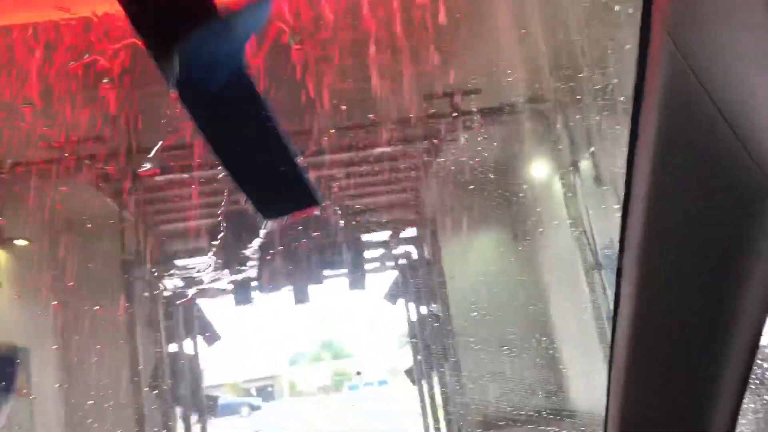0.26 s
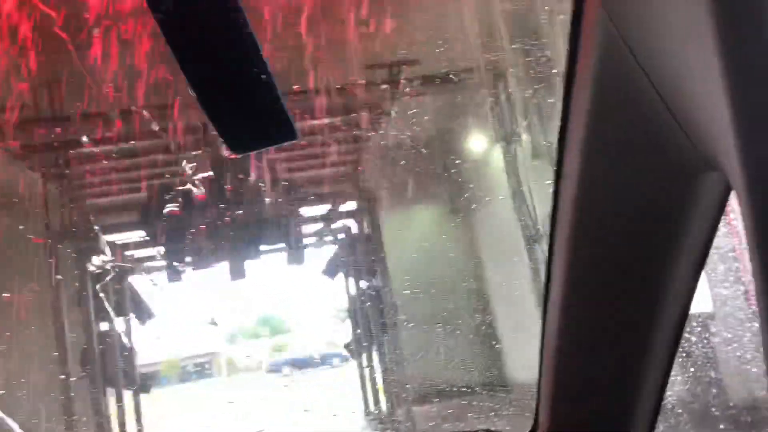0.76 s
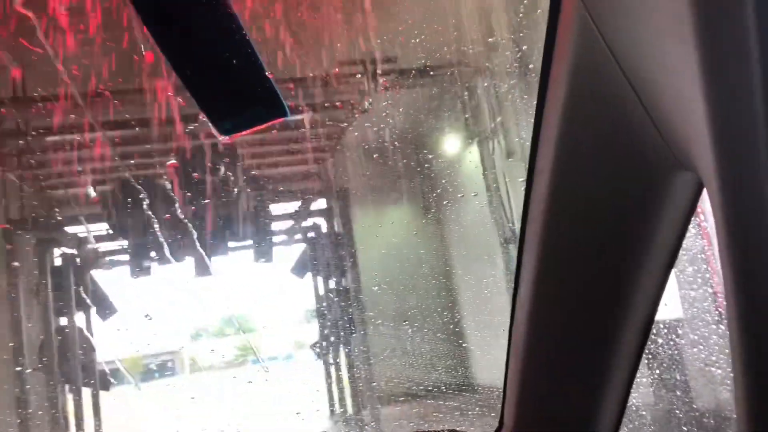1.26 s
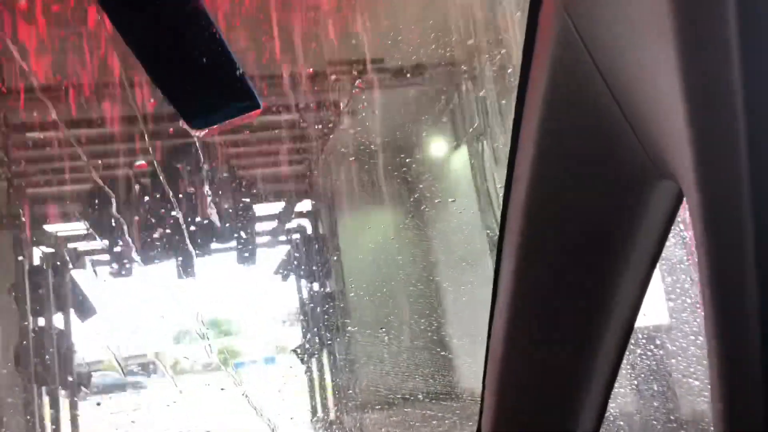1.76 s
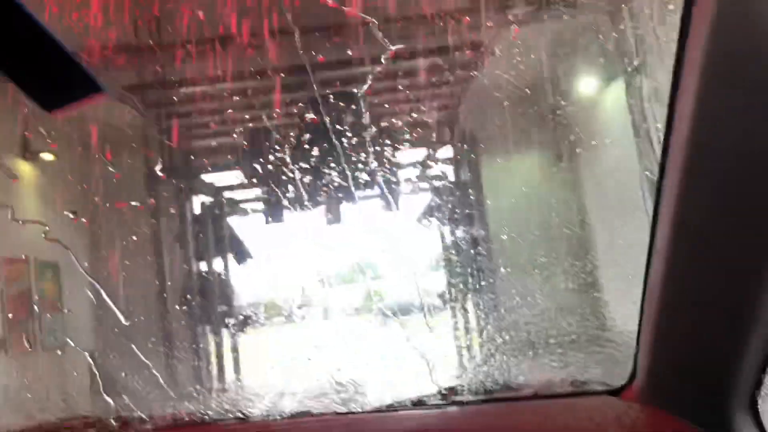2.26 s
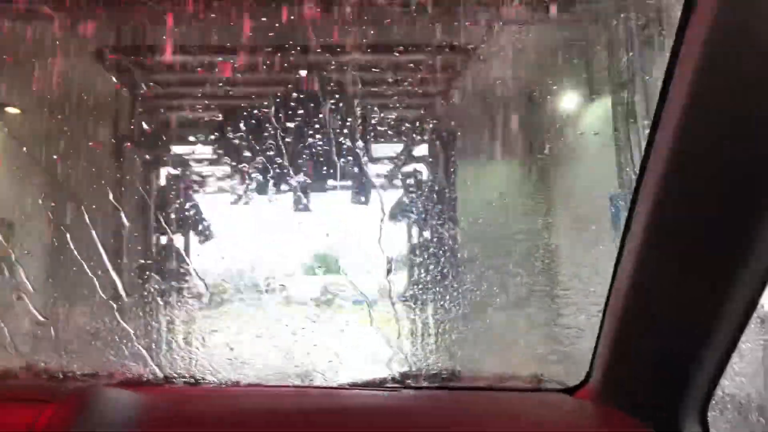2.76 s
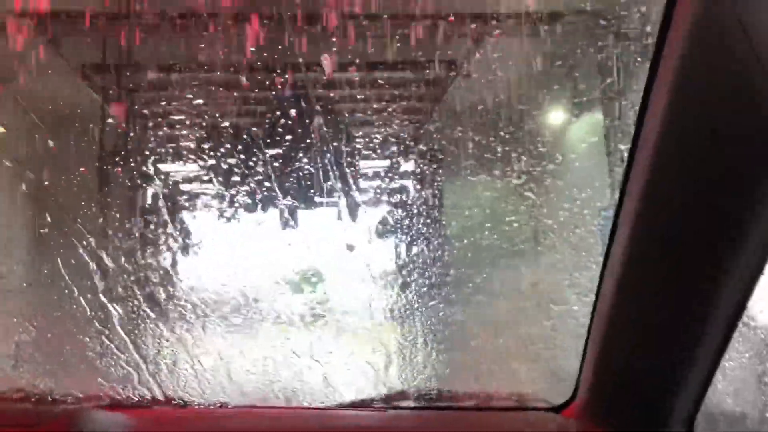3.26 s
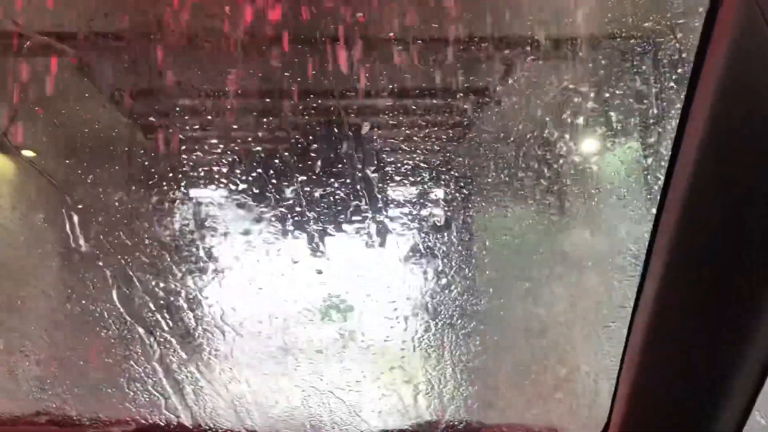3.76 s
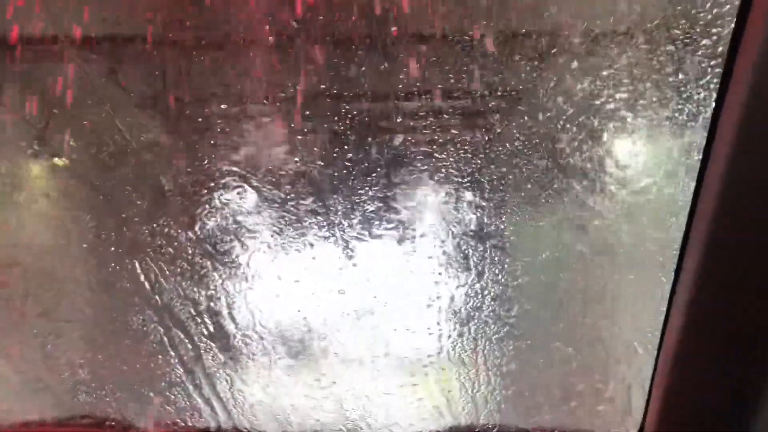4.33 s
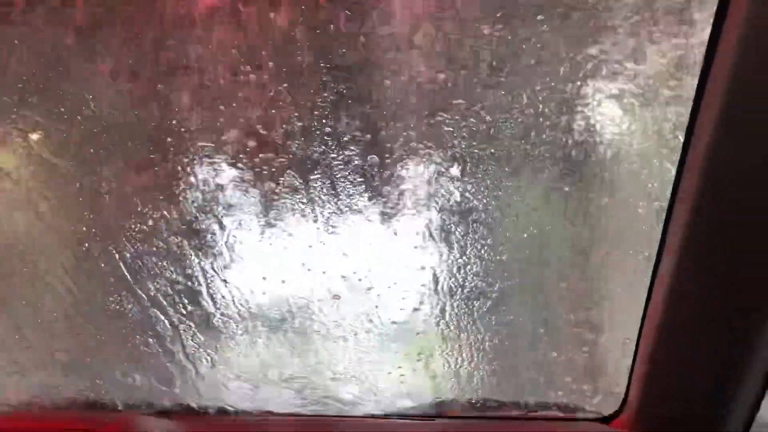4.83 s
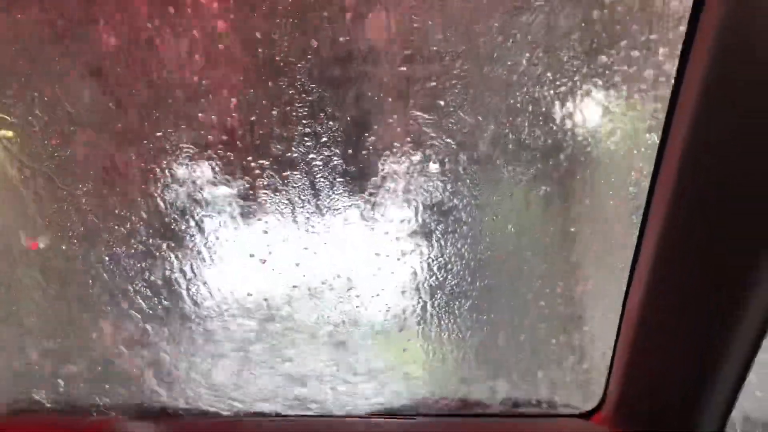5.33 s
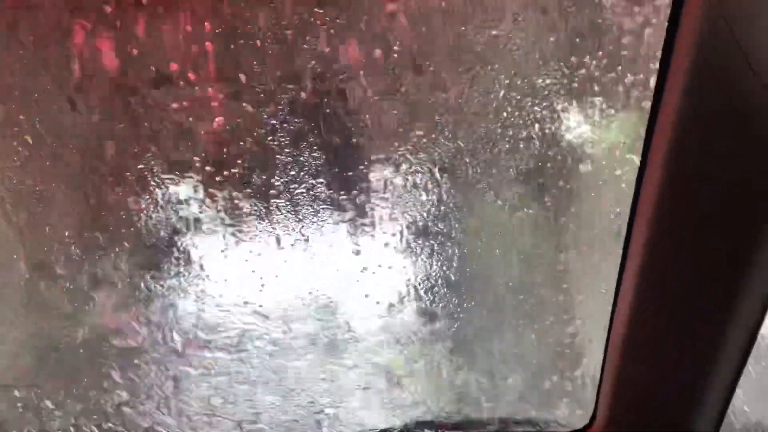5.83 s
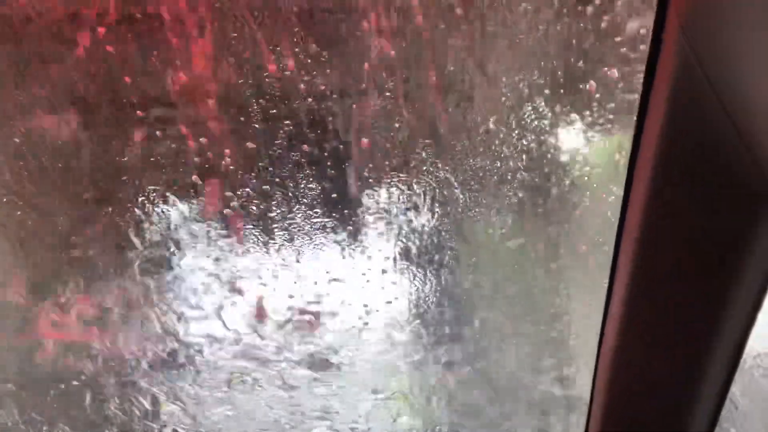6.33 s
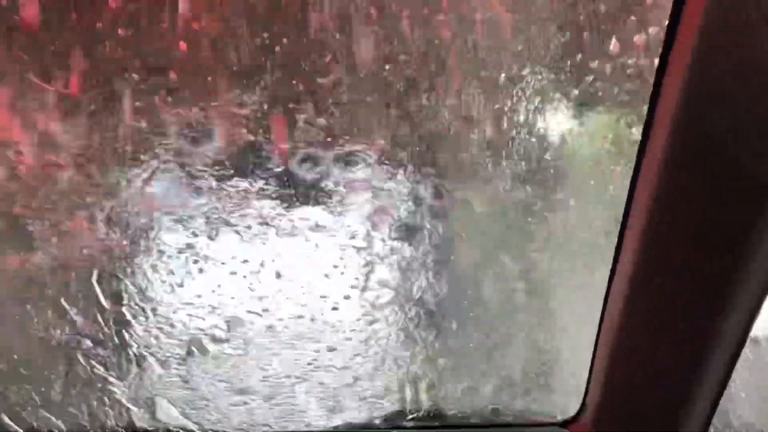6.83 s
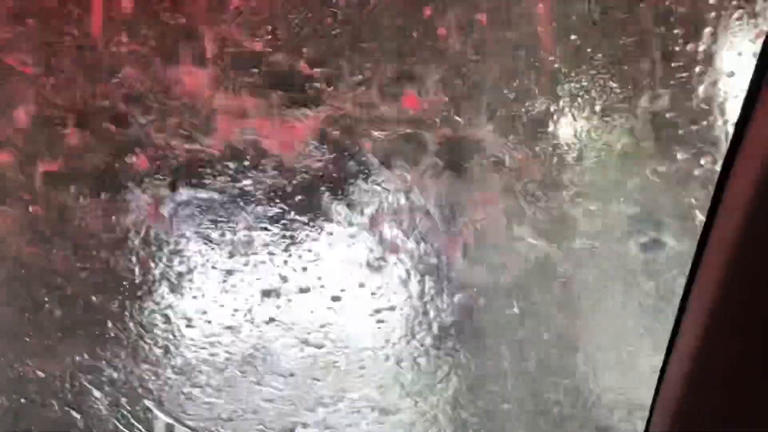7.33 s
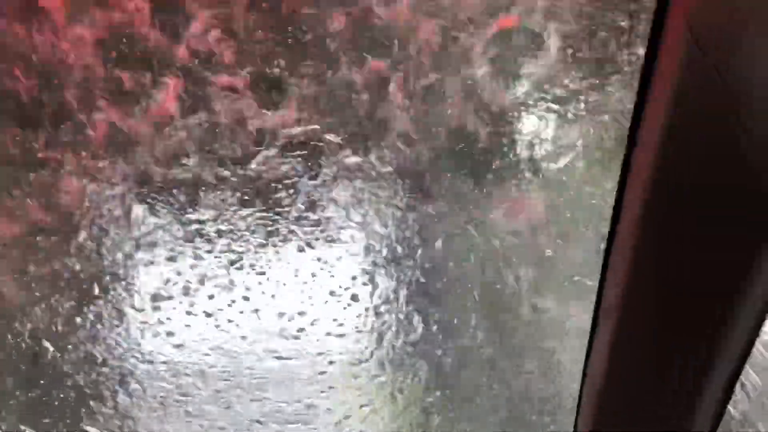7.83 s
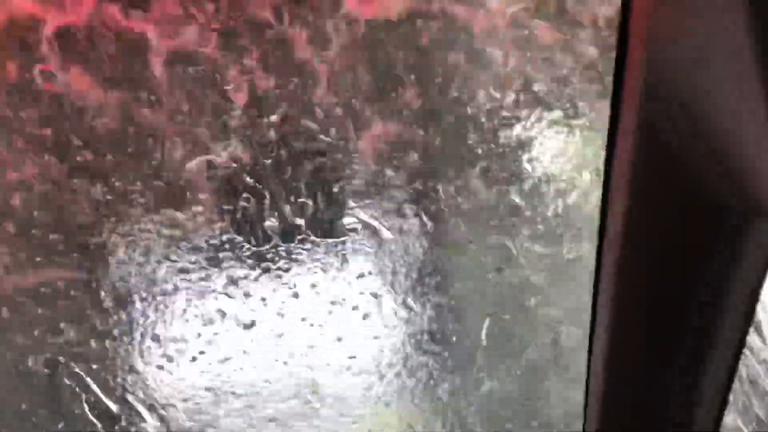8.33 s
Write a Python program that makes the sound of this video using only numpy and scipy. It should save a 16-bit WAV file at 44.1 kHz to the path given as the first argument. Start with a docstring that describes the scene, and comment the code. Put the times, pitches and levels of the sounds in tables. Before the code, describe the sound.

Heavy soaked cloth drags and thuds overhead with a low cabin rumble, then water jets swell into crackling patter on the windshield.

```python
"""Car wash tunnel from inside the car

Wet cloth strips slap the windshield, then drag and thump over the roof, which booms in the cabin.
A spray arch comes closer: first a hiss, then a dense patter of water and foam on the glass.
Cloth and panels: noise forces and sagging sines through metal, cabin and pane resonances.
Water: random clicks, short decaying sines and noise bursts, coloured by spectra."""
import sys
import numpy as np
from scipy import signal
from scipy.fft import irfft
from scipy.io import wavfile
from scipy.ndimage import uniform_filter1d

SR = 44100
rng = np.random.default_rng(int(sys.argv[2]) if len(sys.argv) > 2 else 0)


def file_out(sig):
    """Save sig as 16-bit WAV at sys.argv[1]."""
    # one column per channel
    cols = np.atleast_2d(sig).T
    # limit, then scale
    lim = np.clip(cols, -1, 1)
    pcm = np.round(lim * 32767).astype(np.int16)
    wavfile.write(sys.argv[1], SR, pcm)


N = 378677
TIME = np.arange(N) / SR

# spray on the windshield: (time [s], relative patter level [dB], relative fine mist level [dB])
SPRAY = [(0.0, -39.5, -63), (0.2, -50, -66.5), (1.15, -48.5, -69.5), (1.74, -41, -62.5), (3.11, -42, -55.5),
         (3.85, -44, -55), (4.3, -41, -56), (4.46, -37.5, -53.5), (4.83, -36.5, -51.5), (5.98, -36.5, -52),
         (6.46, -36.5, -50), (7.2, -38.5, -50), (8.13, -40, -52.5), (8.59, -39.5, -52.5)]
# how the jets hit the glass: (time [s], share of separate drops [0-1], pitch of the wetted spot [Hz])
AIM = [(0, 0.4, 2000), (2, 0.03, 3120), (3.9, 0.38, 2650), (4.5, 0.55, 3400), (4.9, 0.55, 3900),
       (5.4, 0.57, 5100), (6.1, 0.56, 6400), (6.5, 0.59, 4130), (7.1, 0.73, 5000), (8.59, 0.5, 3800)]
# resonances of roof and cabin air: (frequency [Hz], width [Hz], relative gain [dB])
ROOF = [(57, 20, -7.5), (84, 37, -8), (126, 21, 0.5), (165, 29.5, -1.5), (224, 50, -14.5)]
# resonances of the body panels: (frequency [Hz], width [Hz], relative gain [dB])
PANELS = [(236.7, 22.6, 4.5), (274, 58, 3.5), (324, 84, -3.5), (414.6, 36, -0.5), (483, 122, -1),
          (549.2, 23.6, 2), (635.5, 78, 0.5), (765, 36, -1.5), (836.4, 60, -4.5)]
# resonances of the windshield: (frequency [Hz], width [Hz], relative gain [dB])
PANE = [(1074, 35, 6.5), (1110, 160, 0), (1356, 33, 3.5), (1330, 75, 3), (1730, 900, -6)]
# spectrum of splashing water: (frequency [Hz], relative gain [dB])
SPLASH = [(300, 7.5), (700, -6), (1100, 1), (1500, -3), (2000, -5), (3000, -17), (6000, -42), (16000, -63)]


def amp(db):
    """Decibels to gain."""
    return 10 ** (np.asarray(db) / 20)


def unit(x):
    """Scales to an rms of one."""
    return x / np.sqrt(np.mean(x ** 2) + 1e-20)


def curve(rows, axis=1):
    """One column of a control table, interpolated at every sample."""
    rows = np.asarray(rows)
    return np.interp(TIME, rows[:, 0], rows[:, axis])


def add(mix, time_s, sound):
    """Mixes a sound in at a given time, in place."""
    part = mix[max(round(time_s * SR), 0):][:len(sound)]
    part += sound[:len(part)]


def peaked(x, db, size=512):
    """Scales a burst so that its loudest stretch of size samples has the given rms level."""
    return amp(db) * x / np.sqrt(uniform_filter1d(x ** 2, size).max() + 1e-20)


def steadied(x, amount, size):
    """Takes a share (amount, 0-1) of the chance swells out of a ringing sound; unit rms."""
    power = abs(uniform_filter1d(x ** 2, size)) + 1e-12
    return unit(x / power ** (amount / 2))


def wander(slow_hz, fast_hz):
    """Random swell of rms one, with equal power in each octave between two rates."""
    hz = np.fft.rfftfreq(N, 1 / SR)[:N // 100] + 1e-3
    weight = 1 / np.sqrt(hz * (1 + (slow_hz / hz) ** 4) * (1 + (hz / fast_hz) ** 4))
    slow = irfft(weight * np.exp(2j * np.pi * rng.random(len(hz))))
    return unit(np.interp(TIME, np.linspace(0, TIME[-1], len(slow)), slow))


def impacts(per_s, spread_db):
    """Random clicks of either sign; levels spread exponentially, up (spread_db > 0) or down."""
    draw = rng.random(N) * SR / per_s
    at = np.flatnonzero(draw < 1)
    out = np.zeros(N)
    out[at] = (-1) ** at * amp(spread_db * np.minimum(-np.log(draw[at]), 4))
    return out


def colour(x, points, size=2048):
    """Minimum-phase filter with the given spectrum, so that clicks keep their sharp front."""
    hz, db = np.transpose(points)
    bins_hz = abs(np.fft.fftfreq(size, 1 / SR)) + 1
    log_gain = np.log(amp(np.interp(np.log(bins_hz), np.log(hz), db)))
    taps = np.fft.ifft(np.exp(np.conj(signal.hilbert(log_gain)))).real
    return signal.oaconvolve(x, taps[:size // 2])[:len(x)]


def ring(x, modes, top_hz, order=3):
    """Each mode is driven by its own force (a row of x); the cabin lining damps what lies above top_hz."""
    out = 0
    for force, (hz, width_hz, db) in zip(x, modes):
        out = out + amp(db) * signal.lfilter(*signal.iirpeak(hz, hz / width_hz, SR), force)
    low_cut = signal.butter(order, modes[0][0] * 0.69, "high", fs=SR, output="sos")
    lining = signal.butter(order, top_hz, fs=SR, output="sos")
    return signal.sosfilt(lining, signal.sosfilt(low_cut, out))


def resonate(x, hz, width_hz):
    """A resonance of gain one that follows the curve hz: shift to 0 Hz, low-pass, shift back."""
    turn = np.exp(2j * np.pi * np.cumsum(hz) / SR)
    r = np.exp(-np.pi * width_hz / SR)
    return 2 * (turn * signal.lfilter([1 - r], [1, -r], x / turn)).real


def patchy(x, depth_db, size):
    """Water lands on ever new spots, so the colour shifts in small patches of time and pitch."""
    z = signal.stft(x, nperseg=size)[2]
    field = uniform_filter1d(rng.standard_normal(z.shape), size=5, axis=0)
    field = unit(uniform_filter1d(field, size=2, axis=1))
    return signal.istft(z * amp(depth_db * field), nperseg=size)[1][:N]


def contact(length_s, rise_s, count=1, size=7000):
    """Rough forces (noise) of a wet contact that lands, flattens and lets go; length at least 2 ms."""
    t = np.arange(size) / SR
    landing = 1 - np.exp(-t / rise_s)
    return rng.standard_normal((count, size)) * landing * np.exp(-(t / max(length_s, .002)) ** 1.5)


def press(rise_s, fall_s, size=9000):
    """Pressure of a strip that lands, peaks and slides off."""
    t = np.arange(size) / SR
    return np.minimum(t / rise_s, 1) ** .7 * np.exp(-(np.maximum(t - rise_s, 0) / fall_s) ** 1.5)


def strike(modes, hz, focus_db_per_octave, own_share, sag, top_hz, size=9000, count=300):
    """Ring of struck sheet metal: the spot's own note, sagging as the dent relaxes, and the nearest modes."""
    octaves = abs(np.log2(np.asarray(modes)[:, :1] / hz))
    force = rng.standard_normal((len(modes), 2 * size)) * amp(-focus_db_per_octave * octaves)
    near = ring(force, modes, top_hz)[size:]  # skips the build-up
    turns = rng.random() + hz * np.cumsum(1 - sag * np.linspace(0, 1, size)) / SR
    note = np.sin(2 * np.pi * turns)
    both = np.sqrt(own_share) * unit(note) + np.sqrt(1 - own_share) * unit(near)
    return steadied(both, amount=1.0, size=count)


def drop(hz, cycles, size=600):
    """The tick of one drop: a few cycles that swell and die."""
    turns = hz * np.arange(size) / SR
    return np.sin(2 * np.pi * turns) * np.sqrt(turns) * np.exp(-turns / cycles)


def splat(hz, length_s, rise_s):
    """Water bursts on the glass: a short rough force that rings around its own pitch."""
    spot = signal.iirpeak(hz, 2.5, SR)
    return signal.lfilter(*spot, signal.lfilter(*spot, contact(length_s, rise_s, size=3000)[0]))


def dragging(level_db=3.5, lumpy_db=2.0, shifting_db=3.5, deep_db=5.0, deep_hz=100, fade_db_per_s=1.4):
    """Heavy cloth drags unevenly over the roof and makes it boom, now in one mode, now in another."""
    # slow pressure of the cloth on the roof: (time [s], relative boom level [dB])
    pressure = [(0.0, -30), (0.8, -28), (1.45, -29.5), (2.3, -30.5), (2.7, -29), (3.15, -33), (4.1, -28.5),
                (5.3, -32.5), (6.26, -29), (7.0, -32), (8.1, -34), (8.59, -27.5)]
    shifting = np.array([wander(6.1, 19) for _ in ROOF])
    unevenness = amp(lumpy_db * wander(1.0, 28) + shifting_db * shifting)
    force = rng.standard_normal((len(ROOF), N)) * unevenness
    # the drive of the deepest modes fades as the curtain moves to the rear of the car
    deep = np.asarray(ROOF)[:, :1] < deep_hz
    force = force * amp(deep * (deep_db - fade_db_per_s * TIME))
    boom = steadied(ring(force, ROOF, top_hz=269), amount=0.49, size=1500)
    return amp(curve(pressure) + level_db) * boom


def drumming(panel_db=7.5, runoff_db=-4.0, lumpy_db=0.93):
    """Gouts of water beat on the panels and splash off them."""
    # water on the body panels: (time [s], relative level [dB])
    levels = [(0.0, -37.5), (0.86, -38), (0.95, -40.5), (1.45, -41), (2.2, -39.5), (2.65, -39.5),
              (3.2, -40), (3.9, -40.5), (4.6, -40), (6.0, -38.5), (7.3, -40), (7.58, -34.5), (7.8, -43),
              (8.25, -42.5), (8.59, -41)]
    surge = amp(lumpy_db * wander(1.5, 30))
    force = np.array([impacts(per_s=450, spread_db=5.0) for _ in PANELS]) * surge
    panels = patchy(ring(force, PANELS, top_hz=930), depth_db=3.0, size=2048)
    splashes = colour(impacts(per_s=3000, spread_db=-2.5) * surge, SPLASH)
    runoff = patchy(splashes, depth_db=3.5, size=1024)
    return amp(curve(levels)) * (amp(panel_db) * unit(panels) + amp(runoff_db) * unit(runoff))


def jet_roar(level_db=-1, lumpy_db=1, top_hz=1200, centre_hz=720, focus_db_per_octave=5):
    """Under the arch the jets also beat on the body panels, ringing mostly their higher modes."""
    octaves = abs(np.log2(np.asarray(PANELS)[:, :1] / centre_hz))
    surge = amp(lumpy_db * wander(2.9, 40))
    force = rng.standard_normal((len(PANELS), N)) * surge * amp(-focus_db_per_octave * octaves)
    return amp(curve(SPRAY) + level_db) * np.sqrt(curve(AIM)) * unit(ring(force, PANELS, top_hz))


def sheeting(level_db=-2, lumpy_db=2.0, patchy_db=4.5):
    """Sheets of water slosh over the windshield in small soft splashes."""
    # water off the curtain onto the glass: (time [s], relative level [dB])
    levels = [(0, -41.5), (1.1, -50), (1.7, -44.5), (2.5, -44.5), (3.5, -41), (4.2, -46), (5.3, -47),
              (6.4, -41.5), (7.2, -50), (8.59, -45)]
    # spectrum of the sloshing: (frequency [Hz], relative gain [dB])
    slosh = [(300, -4), (800, 1), (1050, 2), (1400, 1), (2000, -0.5), (3000, -11.5), (6000, -28),
             (16000, -50)]
    flow = impacts(per_s=2500, spread_db=3.5) * amp(lumpy_db * wander(4.8, 45))
    splashes = patchy(colour(flow, slosh), depth_db=patchy_db, size=1024)
    return amp(curve(levels) + level_db) * unit(splashes)


def patter(level_db=-3.0, clump_db=4.0, spot_db=-4, count=24):
    """The jets break into fine drops that tick densely on the glass; from afar they blur into a wash."""
    # spectrum of water on glass: (frequency [Hz], relative gain [dB])
    glass_spectrum = [(300, -20.5), (900, 3.5), (1500, 2.5), (2200, 0.5), (3100, 2.5), (4700, 0.5),
                      (6300, -5), (8500, -25), (12000, -29), (16000, -39)]
    share = curve(AIM)
    ticks = np.zeros(N)
    for hz in np.geomspace(1200, 10000, count):
        train = signal.oaconvolve(impacts(per_s=260, spread_db=-1.0), drop(hz, cycles=0.92))[:N]
        ticks += np.sqrt(hz) * unit(train)
    wash = rng.standard_normal(N)
    water = np.sqrt(share) * unit(ticks) + np.sqrt(1 - share) * wash
    water = colour(water * amp(clump_db * share * wander(4.7, 200)), glass_spectrum)
    # the colour drifts as the jets sweep the glass
    spot = resonate(water, curve(AIM, axis=2), width_hz=2600)
    water = patchy(water + amp(spot_db) * spot, depth_db=2.5, size=1024)
    return amp(curve(SPRAY) + level_db) * unit(water)


def mist(level_db=4, pin_db=-1.5, clump_db=2.5):
    """Fine mist hisses on the glass, with pinpricks of tiny droplets."""
    # spectrum of the mist: (frequency [Hz], relative gain [dB])
    mist_spectrum = [(4000, -5), (6500, 6), (8000, 4.5), (10000, 1), (12000, -2), (14000, -5), (16000, -4)]
    share = curve(AIM)
    pinpricks = unit(impacts(per_s=1600, spread_db=16.0))
    fizz = rng.standard_normal(N) + amp(pin_db) * share * pinpricks
    fizz = colour(fizz * amp(clump_db * share * wander(5.9, 150)), mist_spectrum)
    return amp(curve(SPRAY, axis=2) + level_db) * unit(patchy(fizz, depth_db=2.0, size=512))


def stray_drops(level_db=-2, per_s=18, spread_db=3.5, tick_db=0.0, tilt_db_per_octave=-4.0, count=24):
    """Middling drops tick and burst all through the patter at many pitches, louder under the arch."""
    out = np.zeros(N)
    for hz in np.geomspace(2800, 7600, count):
        burst = peaked(splat(hz, length_s=0.0018 * rng.uniform(.5, 4.5), rise_s=0.0002), 0, size=48)
        add(burst, 0, peaked(drop(hz, cycles=1.0), tick_db, size=48))
        train = signal.oaconvolve(impacts(per_s, spread_db), unit(burst))[:N]
        out += amp(tilt_db_per_octave * np.log2(hz)) * train
    return amp(curve(SPRAY) + level_db) * curve(AIM) * unit(out)


def slaps(level_db=-3, grain_db=3.5, ring_db=9, sharpness=6, pane_db=-6, tail_db=-15):
    """Cloth tips smack on the glass in a crackling splat; the pane rings hollowly and a dull trickle follows."""
    # cloth tips on the glass: (time [s], relative level [dB], length [s], centre [Hz])
    events = [(0.027, -27.5, 0.028, 1700), (0.29, -23, 0.0079, 2140), (0.297, -27, 0.017, 2100),
              (0.49, -35, 0.046, 1500), (0.526, -30, 0.021, 1860), (0.726, -28, 0.025, 2100),
              (0.729, -32.5, 0.011, 4230), (0.753, -30, 0.04, 4500), (0.776, -35, 0.019, 3060),
              (0.79, -40, 0.012, 2200), (0.803, -31, 0.0099, 3020), (1.195, -37.5, 0.014, 1960),
              (1.351, -38, 0.02, 2510), (1.405, -28, 0.017, 2300), (1.413, -30, 0.0074, 2960),
              (1.872, -29, 0.013, 1910), (3.557, -33, 0.04, 1900)]
    # spectrum of a slap: (frequency [Hz], relative gain [dB])
    slap_spectrum = [(200, -52), (800, 17.5), (1300, -3.5), (2000, 4), (3500, 1.5), (7000, -8.5),
                     (11000, -21.5), (16000, -34)]
    out = np.zeros(N)
    for s, db, length_s, hz in events:
        force = contact(length_s, rise_s=0.00023)[0]
        crackle = unit(uniform_filter1d(rng.standard_normal(len(force)), 50))
        force = force * amp(grain_db * crackle)
        hollow = amp(ring_db) * signal.lfilter(*signal.iirpeak(hz, sharpness, SR), force)
        smack = colour(force + hollow, slap_spectrum)
        pane = ring([force] * len(PANE), PANE, top_hz=2850)
        trickle = colour(contact(length_s=0.049, rise_s=0.0054)[0], SPLASH)
        add(out, s - .001, peaked(smack, db + level_db, size=256))
        add(out, s, peaked(pane, db + level_db + pane_db, size=256))
        add(out, s, peaked(trickle, db + tail_db))
    return out


def flicks(level_db=4, length_s=0.0086, low_hz=6800, high_hz=9500):
    """A few droplets flung off the cloth tick thinly on the glass."""
    # flung droplets: (time [s], relative level [dB])
    events = [(0.083, -63), (0.1067, -55), (0.1775, -60), (0.3244, -63), (0.531, -57), (0.8774, -63),
              (0.9777, -59), (1.1293, -63), (1.288, -57)]
    out = np.zeros(N)
    for s, db in events:
        tick = splat(low_hz, length_s, rise_s=0.0011) + .5 * splat(high_hz, length_s, rise_s=0.0014)
        add(out, s - .001, peaked(tick, db + level_db, size=128))
    return out


def thumps(level_db=1.0):
    """The roof dips under a passing strip and booms for a few cycles."""
    # roof giving way: (time [s], relative level [dB], starting pitch [Hz], rise [s], fall [s])
    events = [(0.086, -14, 104, 0.012, 0.019), (0.133, -15, 156, 0.03, 0.009),
              (0.296, -24, 135, 0.037, 0.0092), (0.42, -21, 110, 0.0061, 0.013),
              (0.542, -14.5, 90.6, 0.023, 0.013), (0.606, -26, 78, 0.009, 0.011),
              (0.639, -19.5, 121, 0.012, 0.02), (0.703, -15, 160, 0.017, 0.011),
              (0.773, -14, 112, 0.013, 0.025), (0.811, -23, 120, 0.041, 0.011),
              (0.972, -15, 163, 0.01, 0.011), (1.066, -19.0, 157, 0.0062, 0.027),
              (1.196, -14.0, 127, 0.011, 0.025), (1.346, -13, 143, 0.011, 0.017),
              (1.504, -15.5, 115, 0.017, 0.025), (1.554, -13.5, 149, 0.012, 0.02),
              (1.682, -19.5, 163, 0.008, 0.034), (1.774, -16, 140, 0.025, 0.012),
              (1.808, -13.5, 116, 0.033, 0.023), (2.124, -18, 178, 0.01, 0.03),
              (2.198, -26, 182, 0.014, 0.01), (2.221, -22.5, 124.6, 0.034, 0.049),
              (2.323, -18, 125, 0.015, 0.012), (2.401, -17.0, 160.5, 0.012, 0.009),
              (2.571, -10, 114, 0.0087, 0.012), (2.594, -16.5, 123.6, 0.032, 0.013),
              (2.896, -15, 162, 0.0062, 0.013), (2.983, -17, 162, 0.017, 0.013),
              (3.441, -21, 125, 0.011, 0.011), (3.56, -21, 106, 0.009, 0.023),
              (3.676, -24, 103, 0.013, 0.014), (3.881, -18.5, 123.5, 0.024, 0.074),
              (3.991, -20.0, 172, 0.037, 0.012), (4.173, -27, 151, 0.009, 0.04),
              (4.554, -18, 136, 0.0085, 0.011), (4.866, -17.5, 169, 0.012, 0.024),
              (5.448, -19, 127, 0.029, 0.01), (5.54, -24, 195, 0.037, 0.031),
              (5.638, -18.0, 176, 0.027, 0.018), (6.036, -20.5, 157, 0.028, 0.01),
              (6.158, -25, 170, 0.044, 0.013), (6.298, -19, 163.4, 0.027, 0.016),
              (6.727, -21.0, 126, 0.018, 0.014), (7.567, -20.0, 163, 0.012, 0.046),
              (7.626, -25, 111, 0.06, 0.018), (7.685, -23, 164, 0.014, 0.014),
              (8.466, -14.5, 158, 0.01, 0.01)]
    out = np.zeros(N)
    for s, db, hz, rise_s, fall_s in events:
        boom = strike(ROOF, hz, focus_db_per_octave=3, own_share=0.49, sag=0.086, top_hz=280, count=700)
        add(out, s, amp(db + level_db) * boom * press(rise_s, fall_s))
    return out


def heaves(level_db=-7, swell_s=0.012):
    """Heavy strips press the roof in, which pumps the cabin air for a few slow cycles."""
    # roof pressed in: (time [s], relative level [dB], mean sway rate [Hz])
    events = [(0.097, -19, 76), (0.532, -10.5, 73), (0.775, -23, 55.3), (1.637, -14, 55.7),
              (2.875, -15, 53), (3.889, -27, 59.5), (5.649, -10, 54), (6.899, -22, 56), (7.646, -11, 61.4)]
    out = np.zeros(N)
    t = np.arange(SR // 4) / SR
    for s, db, mean_hz in events:
        hz = mean_hz * rng.uniform(.9, 1.1)
        sway = np.sin(2 * np.pi * hz * t) * t ** 2 * np.exp(-t / swell_s)
        add(out, s - .012, peaked(sway, db + level_db))
    return out


def blows(knock_db=-.5, splash_db=0, pane_db=-2, splash_share=0.92, trickle_db=-9, trickle_s=0.037):
    """Each strip knocks the panels, smacks the windshield briefly and throws off water that trickles on."""
    # cloth strips from the swinging curtain, each spot with its own pitch:
    # (time [s], relative knock level [dB], starting pitch [Hz], rise [s], fall [s], wet splash level [dB])
    events = [(0.231, -33.5, 259, 0.027, 0.048, -55), (0.53, -21, 277, 0.0088, 0.019, -35),
              (0.724, -19.5, 532, 0.004, 0.017, -44), (0.769, -19.5, 420, 0.015, 0.011, -42.0),
              (0.982, -22, 282, 0.033, 0.0071, -48), (1.202, -25.5, 237, 0.003, 0.022, -41),
              (1.262, -24, 524, 0.025, 0.014, -43), (1.35, -23.5, 318, 0.003, 0.017, -36.5),
              (1.497, -20.5, 226, 0.016, 0.0087, -37), (1.547, -25, 327, 0.0098, 0.032, -43),
              (1.755, -24.5, 536, 0.0044, 0.028, -37.5), (1.826, -14.5, 259.4, 0.0082, 0.041, -37),
              (2.077, -24.5, 235, 0.036, 0.07, -41.5), (2.321, -24.0, 550, 0.012, 0.039, -40),
              (2.666, -24, 473, 0.003, 0.014, -45), (2.781, -18.5, 509, 0.0054, 0.053, -38.5),
              (2.849, -17.5, 328, 0.024, 0.037, -37.5), (2.975, -16.5, 233, 0.0074, 0.011, -38),
              (3.051, -29, 262, 0.0077, 0.057, -56), (3.234, -26.5, 563, 0.0066, 0.024, -43),
              (3.417, -27, 265.5, 0.0034, 0.035, -36.5), (3.516, -25, 608, 0.0033, 0.041, -39),
              (3.572, -18, 289, 0.0027, 0.024, -34.5), (3.743, -24.5, 271, 0.0047, 0.066, -43),
              (3.814, -16, 514, 0.0057, 0.033, -39), (3.891, -20.5, 293, 0.021, 0.023, -39.0),
              (3.934, -33, 258, 0.01, 0.019, -55), (3.976, -25, 261, 0.004, 0.046, -57),
              (4.307, -33, 276, 0.005, 0.008, -48.0), (4.816, -18, 264.7, 0.04, 0.035, -34),
              (4.944, -25, 751, 0.033, 0.028, -39), (5.414, -20, 225, 0.0057, 0.051, -42),
              (5.529, -13.5, 638, 0.007, 0.028, -28), (5.64, -18.5, 309, 0.007, 0.038, -51),
              (6.199, -30.5, 508, 0.003, 0.03, -47), (6.427, -20.5, 452, 0.027, 0.011, -46),
              (7.034, -24.0, 304, 0.0055, 0.011, -54), (7.433, -21.5, 270.5, 0.028, 0.042, -32.5),
              (7.573, -16.5, 533, 0.0064, 0.043, -37), (7.637, -19.5, 312, 0.014, 0.039, -47),
              (7.7, -17.5, 559, 0.005, 0.026, -36.5), (8.35, -21, 502, 0.019, 0.022, -48),
              (8.389, -21.5, 269, 0.005, 0.021, -51), (8.442, -22, 250, 0.024, 0.034, -42)]
    out = np.zeros(N)
    for s, db, hz, rise_s, fall_s, wet_db in events:
        knock = strike(PANELS, hz, focus_db_per_octave=2.0, own_share=0.28, sag=0.097, top_hz=900)
        knock = knock * press(rise_s, fall_s)
        forces = rng.standard_normal((len(PANE), len(knock)))
        water = unit(colour(forces[0], SPLASH))
        pane = unit(ring(forces, PANE, top_hz=2850))
        smack = (amp(pane_db) * pane + amp(splash_db) * water) * press(rise_s, fall_s * splash_share)
        trickle = amp(trickle_db) * water * press(rise_s + fall_s, trickle_s)
        add(out, s, amp(db + knock_db) * knock + amp(wet_db) * (smack + trickle))
    return out


def plops(level_db=-3, cycles=9, rough_db=-4):
    """A gout of water traps air as it lands on the body, and the pocket rings briefly."""
    # gouts: (time [s], relative level [dB], pitch [Hz])
    events = [(1.0, -38, 1840), (2.6047, -32.5, 1710), (3.0926, -34, 1125), (3.243, -36, 1660),
              (3.586, -26.5, 1285), (3.855, -31, 1180), (4.027, -32, 1400), (4.85, -30, 1490),
              (5.421, -30, 1485), (5.537, -43, 1920), (5.649, -38, 1410)]
    out = np.zeros(N)
    for s, db, hz in events:
        pocket = peaked(drop(hz, cycles, size=3000), 0, size=192)
        rough = peaked(splat(hz, length_s=0.033, rise_s=0.0037), rough_db, size=192)
        add(out, s - .003, peaked(pocket + rough, db + level_db, size=192))
    return out


def large_drops(level_db=0.5, cycles=3.0, splat_db=2.5):
    """A fat drop ticks on the glass and bursts, standing out of the patter."""
    # large drops: (time [s], relative level [dB], pitch [Hz], length, held to 0.002 or more [s])
    events = [(2.005, -37, 3660, 0.014), (2.1902, -39, 2840, 0.008), (3.5605, -36, 2600, 0.004),
              (3.934, -38.0, 3130, 0.0012), (4.003, -38, 3170, 0.0018), (4.4766, -30.5, 3760, 0.0058),
              (4.483, -26.5, 3050, 0.0039), (4.622, -31, 3820, 0.0017), (4.679, -27, 3840, 0.0013),
              (4.7044, -30.0, 2980, 0.0019), (4.7277, -32, 3010, 0.0036), (4.785, -28.5, 3030, 0.0021),
              (4.807, -28, 5000, 0.0016), (4.845, -32, 4590, 0.001), (4.954, -29, 4260, 0.0069),
              (4.9754, -27, 3190, 0.0017), (5.01, -29, 3420, 0.0023), (5.07, -31.0, 4060, 0.0035),
              (5.194, -31.0, 4770, 0.0039), (5.2111, -33, 5920, 0.0023), (5.346, -31, 3650, 0.0013),
              (5.401, -28, 3120, 0.0039), (5.4938, -35, 3540, 0.001), (5.574, -32.0, 3930, 0.0043),
              (5.7571, -33.0, 2800, 0.005), (5.9025, -31.5, 5860, 0.0038), (6.0832, -32.0, 3480, 0.0016),
              (6.3989, -24, 4430, 0.001), (6.405, -30.0, 4220, 0.0013), (6.459, -27.5, 3500, 0.0049),
              (6.576, -32, 3690, 0.0012), (6.5941, -29, 4080, 0.001), (6.628, -32, 2790, 0.0025),
              (6.951, -34, 2940, 0.0033), (7.506, -32.0, 3010, 0.0013), (7.599, -34, 5270, 0.0058),
              (7.633, -40, 3890, 0.0013), (7.682, -38, 3730, 0.001), (7.909, -32.0, 3130, 0.0051),
              (7.934, -33, 2830, 0.0036), (8.1652, -32.0, 5040, 0.0013), (8.1993, -30.0, 3520, 0.0012),
              (8.233, -33.0, 3320, 0.008), (8.46, -34, 7400, 0.0053)]
    out = np.zeros(N)
    for s, db, hz, length_s in events:
        sound = amp(splat_db) * peaked(splat(hz, length_s, rise_s=0.00012), 0, size=64)
        add(sound, 0, peaked(drop(hz, cycles), 0, size=64))
        add(out, s, peaked(sound, db + level_db, size=64))
    return out


def snaps(level_db=-3, low_hz=3500, top_hz=11000):
    """A hard drop meets the glass head-on with a bright click."""
    # hard drops: (time [s], relative level [dB])
    events = [(5.697, -32), (6.3964, -25), (6.875, -36), (6.963, -30), (7.001, -39), (7.036, -31),
              (7.2205, -36), (7.3172, -30), (8.457, -33)]
    out = np.zeros(N)
    band = signal.butter(1, [low_hz, top_hz], "band", fs=SR)
    for s, db in events:
        click = signal.lfilter(*band, contact(length_s=0.002, rise_s=0.0001, size=800)[0])
        add(out, s, peaked(click, db + level_db, size=64))
    return out


def scene():
    """Sum of the body sounds and the windshield sounds, one channel."""
    body = dragging() + drumming() + jet_roar() + thumps() + heaves() + blows() + plops()
    glass = sheeting() + patter() + mist() + stray_drops() + slaps() + flicks() + large_drops() + snaps()
    return (body + glass)[None]


def record(dry, low_cut_hz=29, cutoff_hz=15780):
    """The microphone's low cut and the recorder's band limit."""
    lean = signal.sosfilt(signal.butter(3, low_cut_hz, "high", fs=SR, output="sos"), dry)
    band_limit = signal.firwin(1023, cutoff_hz, window=("kaiser", 9), fs=SR)
    return signal.oaconvolve(lean, band_limit[None], "same")


dry = scene()
out = record(dry)
file_out(out)
```